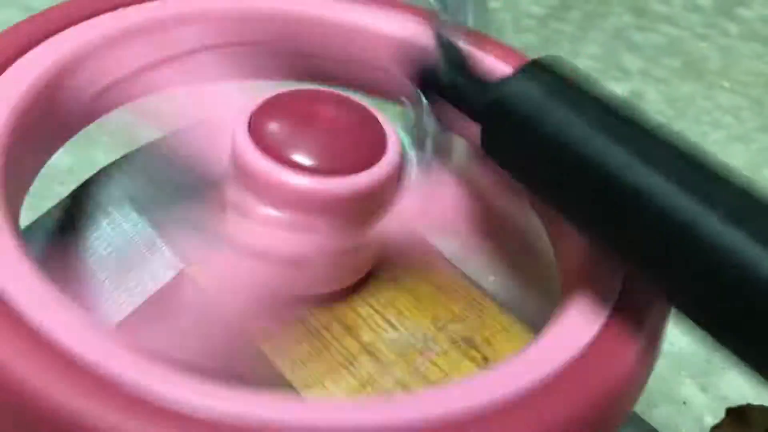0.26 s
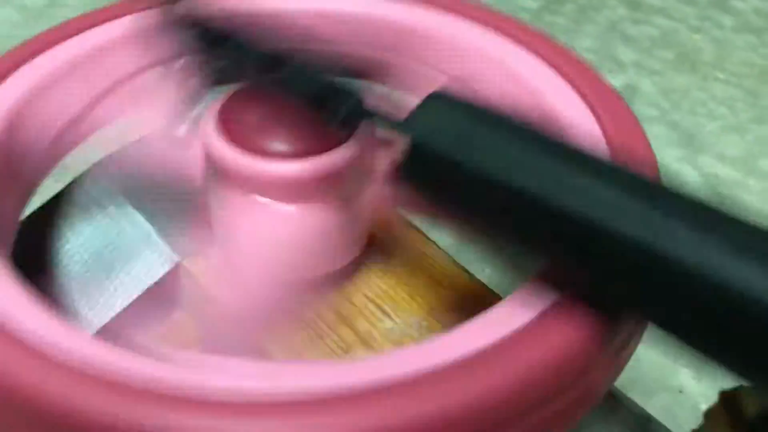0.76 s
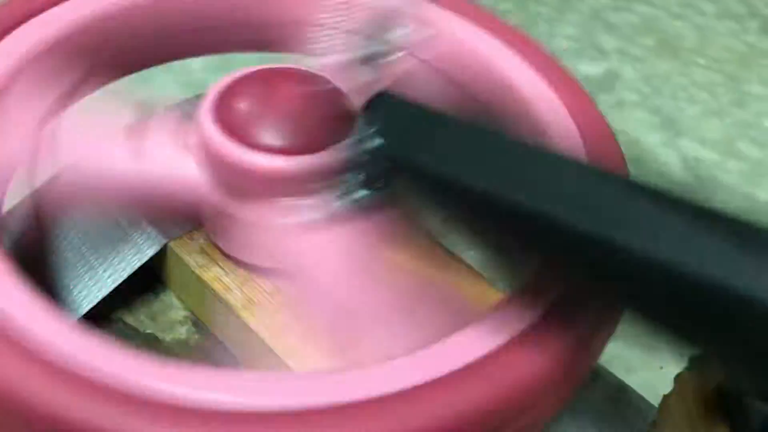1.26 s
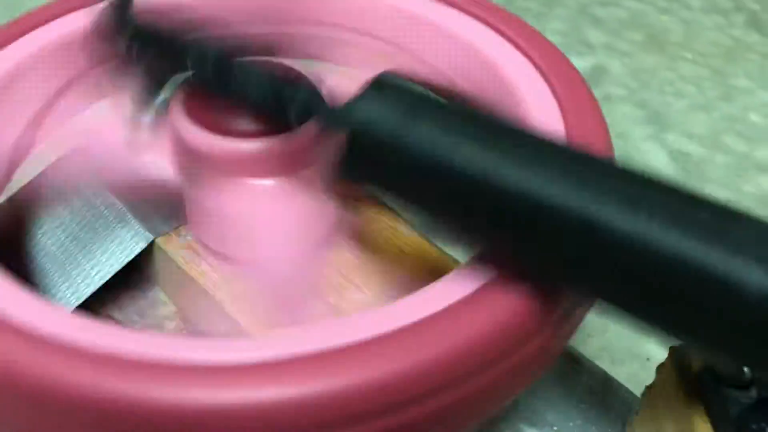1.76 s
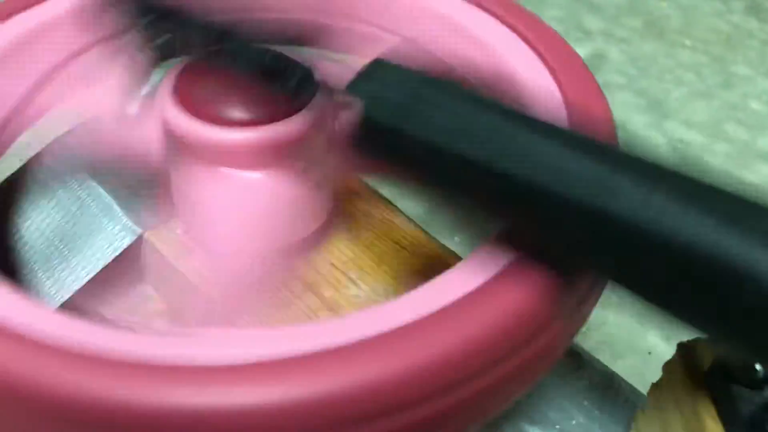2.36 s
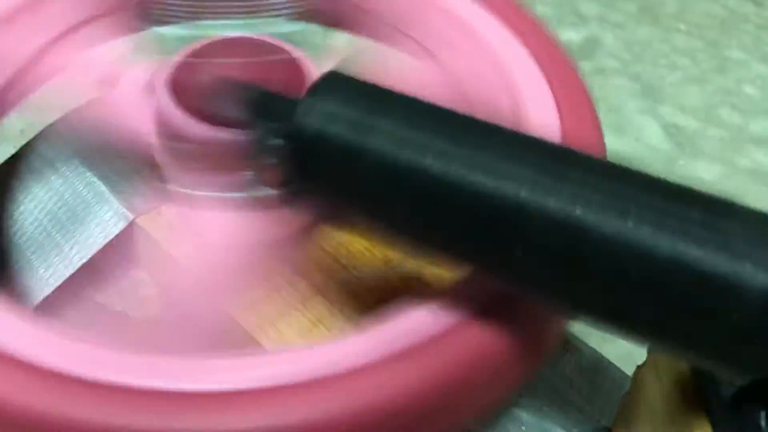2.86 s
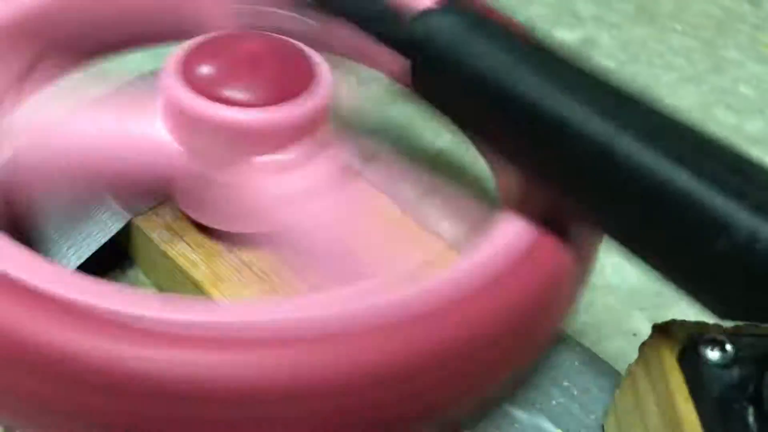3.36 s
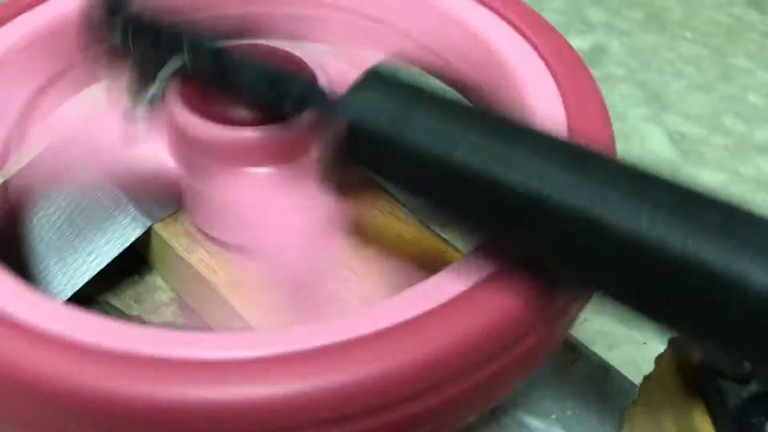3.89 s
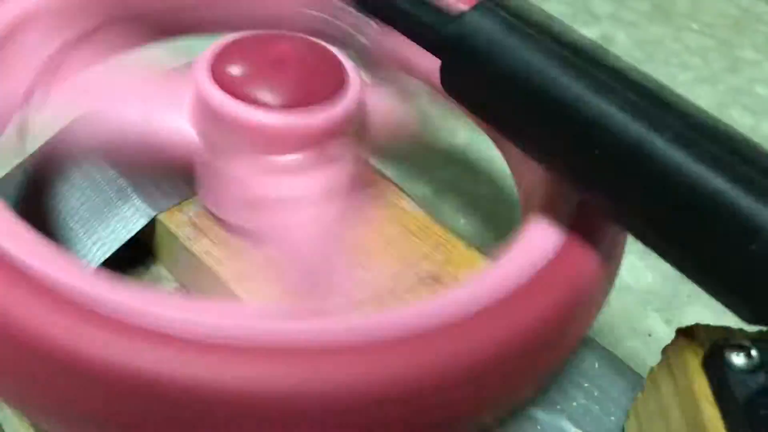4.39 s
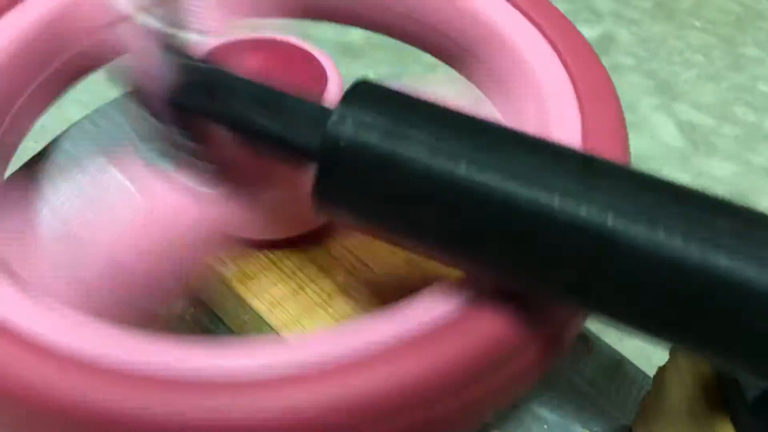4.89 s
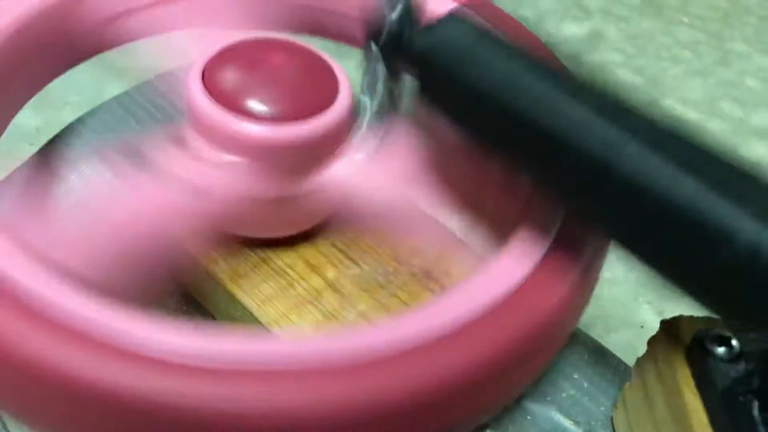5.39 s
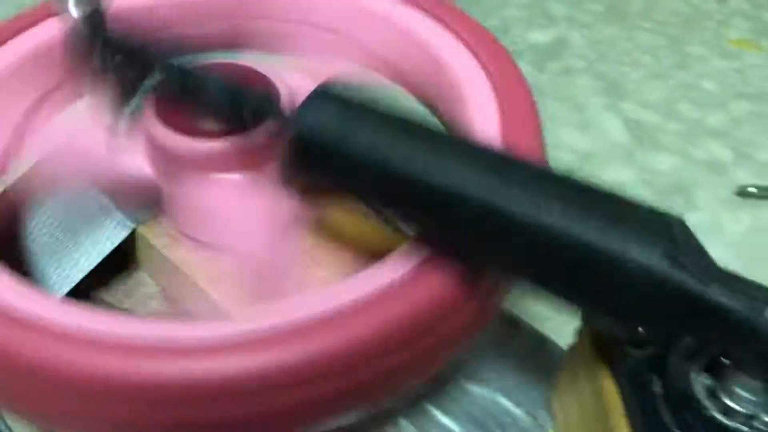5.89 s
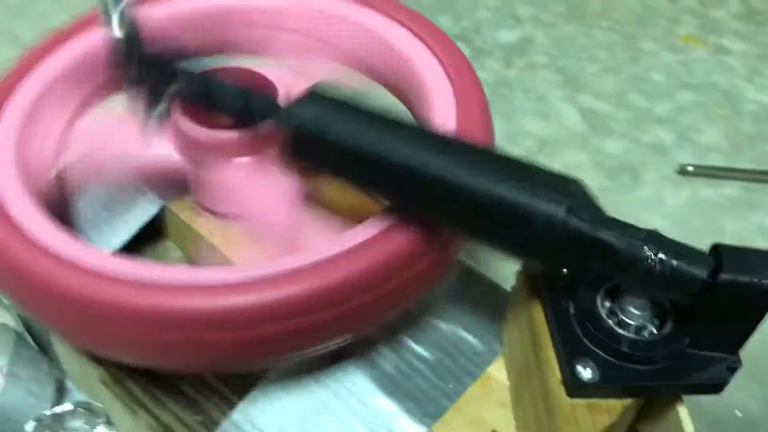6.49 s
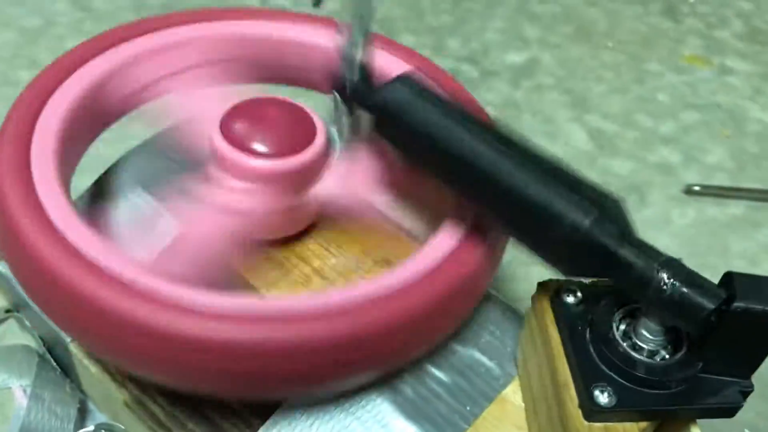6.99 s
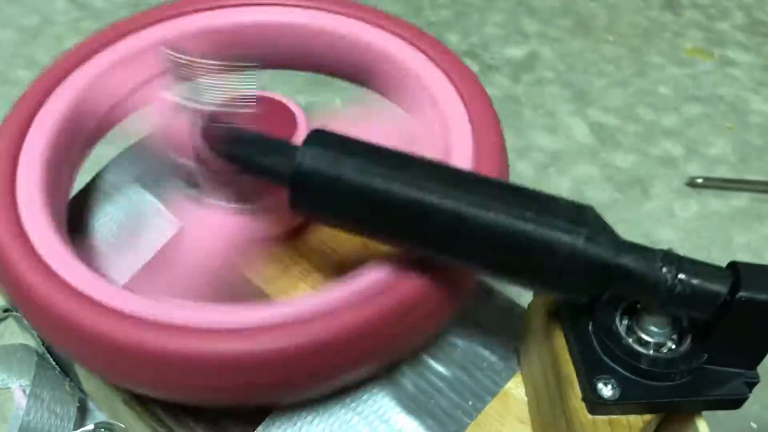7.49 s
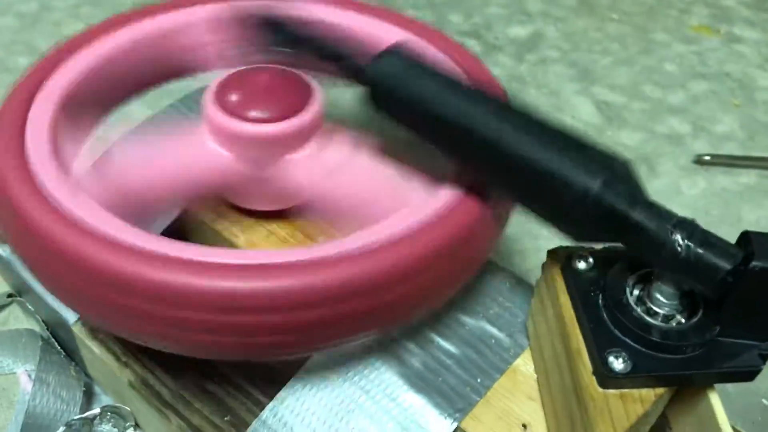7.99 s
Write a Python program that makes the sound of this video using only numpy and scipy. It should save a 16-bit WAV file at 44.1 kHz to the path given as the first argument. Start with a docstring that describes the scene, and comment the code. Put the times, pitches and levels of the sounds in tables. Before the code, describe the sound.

A small compressed-air engine runs steadily beside a close hand-held microphone. Bright air hiss never stops, swelling into about five puffs a second. Each turn brings a hollow puff, a hard little knock with a squirt of air, then a lower hollow note sliding down and a soft thud. Faint motor hum and low rumble lie beneath, and the hiss changes colour slightly as the microphone drifts.

```python
"""A small compressed-air engine turns a plastic wheel five times a second, close to one hand-held microphone.
From the start to the end air hisses from the valve, as jet noise swelling with the crank angle. Each turn, air puffs
ring a short tube before the reversal; there the rod knocks modes and trapped air squirts; then a long tube, blown
by air, drops in pitch as the piston draws out, and the stand thuds. A motor hums in the room over a low rumble.
The colour of the hiss shifts near 1 s and twice around 6 s as the microphone drifts, and the rumble falls a little."""
import sys
import numpy as np
from scipy import signal
from scipy.io import wavfile
from scipy.ndimage import uniform_filter1d

SR = 44100
rng = np.random.default_rng(int(sys.argv[2]) if len(sys.argv) > 2 else 0)


def master_out(mix):
    """Clip the mix to full scale and print it as 16-bit PCM to the path in sys.argv[1]."""
    frames = np.transpose(np.atleast_2d(mix))
    ceiling = np.clip(frames, -1, 1)
    pcm = np.round(ceiling * 32767).astype(np.int16)
    wavfile.write(sys.argv[1], SR, pcm)


N = 363825

# Turns of the crank. Each row: piston reversal in seconds, short-tube puff in dB, long-tube puff in dB,
# rod knock in dB and stand thud in dB, the last two being peaks before a fixed trim.
TURNS = [(0.033, -25, -29.5, -26, -39), (0.215, -24.5, -36, -21, -34), (0.402, -26.5, -34, -6.5, -32),
         (0.592, -26, -26.5, -10, -35), (0.783, -25.5, -26.5, -8.5, -28), (0.977, -26, -27, -8, -31),
         (1.169, -24, -26.5, -13, -26), (1.361, -22, -31, -13, -28), (1.557, -22.5, -27, -13, -26),
         (1.757, -24, -29, -14, -29), (1.953, -23.5, -28.5, -10, -42), (2.153, -23.5, -29.5, -13, -25),
         (2.353, -21, -27, -23, -25), (2.551, -23, -27.5, -11, -23), (2.751, -22.5, -26, -11, -35),
         (2.947, -22.5, -28, -6.5, -41), (3.144, -25.5, -25.5, -9, -30), (3.339, -21.5, -28, -14, -33),
         (3.535, -24, -29, -7, -37), (3.731, -25, -26, -11, -24), (3.926, -24, -27, -14, -32),
         (4.127, -23, -31, -16, -32), (4.324, -20, -29, -12, -24), (4.521, -23.5, -29, -11, -25),
         (4.724, -25, -30.5, -10.5, -36), (4.925, -21, -29, -7.5, -33), (5.125, -23.5, -27, -9, -25),
         (5.328, -22.5, -27.5, -9, -29), (5.528, -23, -28.5, -10, -32), (5.729, -23, -30, -6, -32),
         (5.925, -24, -27.5, -10.5, -26), (6.123, -24, -29.5, -12, -40), (6.327, -24.5, -29, -12, -25),
         (6.529, -25.5, -28, -12, -37), (6.734, -28, -31.5, -8, -41), (6.932, -28.5, -30.5, -11, -44),
         (7.132, -31, -28, -9.5, -29), (7.335, -28, -29.5, -10, -41), (7.538, -27.5, -30, -17, -34),
         (7.737, -31, -30.5, -8.5, -31), (7.945, -28, -32, -10, -28), (8.151, -29, -29, -7.5, -39)]
# Valve stages: exhaust port open, flow cut off before the reversal, surge as the port narrows, surge half a turn
# away, last rush at the reversal, pressure on the seal, flow cut off again. Each row: centre, rise and fall in
# shares of a turn, then what it adds to exhaust rush, steady flow and seal leak as factors.
VALVE_STAGES = [(0.68, 0.13, 0.099, 0.87, 0.016, 0.2), (0.96, 0.035, 0.037, -0.027, -0.67, 0.083),
                (.86, .05, .05, 0.13, 0.37, 0.033), (0.466, 0.053, .06, -0.043, 0.11, 0),
                (.005, 0.026, .05, 0.058, 0.062, 0.11), (0.067, 0.086, 0.21, -0.017, -0.39, 0.83),
                (.26, 0.063, 0.09, -0.044, -0.76, 0.14)]
# Lift of the hiss by one unit of each part. Each row: frequency in Hz, rush in dB, flow in dB, leak in dB.
HISS_LIFT = [(900, -4, -3, 7.5), (1410, 7, -1, 6), (1960, 3, 5.5, 4.5), (2650, 4.5, 2, 1),
             (3020, 7.5, 1, -2), (3420, 2, 1.5, -1), (4170, 0.5, 3.5, -0.5), (5060, 0.5, 3.5, 1),
             (5500, -1, 5, 0), (5700, 1, 4.5, 0.5), (6600, 1.5, 2.5, 3), (8460, 5.5, 1, -4),
             (10200, -0.5, 1, 5), (13000, 1, 0.5, 4.5), (15500, 0, 0, 3.5)]
# Air supply. Each row: time in seconds, hiss level in dB, force of the exhaust rush as a factor.
AIR_SUPPLY = [(0, -16.5, 0.57), (.2, -18, 0.61), (.55, -17, 1.6), (1, -17, 1.5), (1.6, -16.5, 0.94),
              (2.3, -17, 1.07), (3, -17.5, 0.95), (3.8, -17.5, 1.1), (4.6, -17, 0.9), (5.4, -18, 0.88),
              (5.9, -16.5, 1.26), (6.6, -17, 0.94), (7.4, -17.5, 0.9), (8.25, -18.5, 0.5)]
# Microphone drift past nearby surfaces. Each row: time in seconds, number of the standpoint.
MIC_DRIFT = [(0, 0), (.9, 0), (1.3, 1), (5.5, 1), (6, 2), (6.4, 2), (6.75, 3), (8.25, 3)]
# Broad hiss colour, one table a standpoint. Each row: frequency in Hz, relative density in dB per Hz.
STANDPOINT_SLOPES = [
    [(240, -41), (400, -8), (839, -6.5), (1070, -5.5), (1380, -6.5), (2090, -4), (2400, -2.5), (3160, 0),
     (5030, -7.5), (5690, -0.5), (10400, -8), (12300, -10), (16000, -11)],
    [(240, -45), (400, -8.5), (865, -8), (1010, -7.5), (2120, -3.5), (2880, -3), (3160, 0), (4050, -5.5),
     (5690, -4), (9760, -4.5), (10500, -11.5), (15000, -7.5), (16000, -15)],
    [(240, -45), (400, -10), (893, -10.5), (1930, -7), (2250, -7), (2840, -0.5), (3420, 0.5), (3870, -6),
     (6640, -6.5), (9180, -5.5), (10700, -10), (15000, -8.5), (16000, -4.5)],
    [(240, -46), (400, -12.5), (1130, -8), (1680, -5.5), (1840, -11), (2090, -0.5), (2550, -8), (3260, 1),
     (4800, -4), (6850, -6.5), (10400, -9), (15000, -6.5), (16000, -5.5)],
]
# Hiss resonances, one table a standpoint. Each row: frequency in Hz, width in Hz, mean relative level in dB.
STANDPOINT_RINGS = [
    [(2100, 140, -1.5), (3150, 280, -0.5), (3720, 82, 2), (4300, 57, -6), (4740, 88, -2.5), (5780, 210, -2),
     (7030, 160, 3), (8670, 200, -3), (9100, 150, -3), (10000, 71, -7), (10800, 230, -19), (12000, 480, -6),
     (12700, 210, -4), (15200, 210, -4)],
    [(2020, 260, -11.5), (3180, 255, 4), (3764, 250, -0.5), (4308, 107, -2), (5497, 140, 0.5),
     (5880, 160, 0.5), (6330, 240, -11.5), (6920, 140, -2.5), (8630, 180, -3), (9950, 84, -4.5),
     (10850, 250, -8), (11400, 140, -8), (11700, 330, -10.5), (14800, 260, -15), (15500, 220, -5)],
    [(1900, 410, -6), (3430, 490, -7.5), (4590, 160, -6.5), (5850, 65, -5), (6540, 88, -1), (6930, 37, 0),
     (8110, 85, -12), (8500, 110, -13), (9000, 200, -3), (10600, 27, -14), (11800, 210, -10),
     (15500, 140, 4)],
    [(1710, 110, -5), (2090, 190, -4.5), (2940, 400, 0.5), (3760, 300, -2.5), (4180, 130, 3.5),
     (5100, 140, -7), (6300, 280, 0.5), (6870, 400, -4), (8200, 340, -4), (8830, 200, -2), (9560, 300, -5),
     (11250, 120, -9), (12800, 200, -5), (14100, 300, -6), (15400, 700, -2.5)],
]
# Narrow dips in the hiss colour. Each row: frequency in Hz, width in Hz, depth in dB.
HISS_DIPS = [(550, 76, -1.5), (1360, 58, -1), (4090, 124, -2.5), (4820, 250, -0.5), (6280, 120, -2),
             (7650, 330, -2), (10500, 350, -2.5)]
# Puffs into each tube. Each row: centre, rise and fall in shares of a turn, level in dB against the turn's puff.
SHORT_TUBE_PUFFS = [(0.855, .07, 0.052, -8), (0.94, 0.047, 0.054, 3), (0.024, .02, 0.12, -2.5)]
LONG_TUBE_PUFFS = [(.98, 0.039, 0.041, -4.5), (0.17, .11, 0.058, -1), (.31, .07, 0.1, -8),
                   (0.96, 0.22, .12, -21)]
# Modes of the rod and of the stand. Each row: frequency in Hz before detuning, relative level in dB, t60 in seconds.
ROD_MODES = [(1028, -7, 0.28), (1450, 0, 0.033), (2090, 5, .04), (3040, 4, 0.027), (4230, -9, .02)]
STAND_MODES = [(275, 5, 0.032), (354, 3.5, 0.037), (530, -14, .04)]
# Room drones. Each row: frequency in Hz, width of the first resonator in Hz, level in dB rms.
ROOM_DRONES = [(64.7, 7.5, -44), (72.3, 7.6, -52), (86, 5.7, -51), (146.8, 12, -49), (156.6, 5.4, -50.5),
               (204, 16, -50), (313.1, 5.7, -51.5)]
# Steady motor tones. Each row: frequency in Hz, level in dB rms.
MOTOR_TONES = [(109.6, -51), (119.9, -41.5), (239.8, -53.5)]
# Low rumble. Each row: frequency in Hz, relative density in dB per Hz.
RUMBLE_SPECTRUM = [(15, -44), (25, -19), (49, -14), (118, 1), (136, -3), (168, -4.5), (233, -3.5),
                   (356, -12.5), (500, -39), (650, -57), (1100, -120)]

FLOW_OPEN = 0.89  # steady flow between stages, a factor
SHORT_HZ, SHORT_WIDTH_HZ = (1075, 1180), (155, 290)  # before and after the reversal
LONG_HZ, LONG_WIDTH_HZ = (749, 387), (200, 240)  # piston in, piston drawn out
# shares of a turn: leaves the first pitch, arrives at the second, starts back, is back
SHORT_CHANGE, LONG_CHANGE = (0, .06, .3, .75), (.17, .3, .55, .82)
SHORT_REST_DB, LONG_REST_DB = -40, -21.5  # against the turn's puff
KNOCK_LAG_S, THUD_LAG_S, THUD_SCATTER_S = -0.001005, .049, 0.00893
RUMBLE_DB = -40
EDGE_HZ = 15760


def hiss(t):
    """Jet noise, swelling with the valve and coloured by where the microphone stands."""
    white = rng.standard_normal(N)
    swelling = shaped(white, size=256, gain=valve_swell)
    jet = shaped(swelling, size=1024, gain=standpoint)
    s, level_db, _ = np.transpose(AIR_SUPPLY)
    return evened(jet) * gain_of(np.interp(t, s, level_db))


def valve_swell(t, hz, patchy_db=1.05, flicker_db=0.45):
    """Valve stages lift parts of the hiss spectrum; eddies add patches and a wide flicker."""
    rush, flow, leak = sum(np.outer(row[3:], stage(t, *row[:3])) for row in VALVE_STAGES)
    s, _, force = np.transpose(AIR_SUPPLY)
    parts = rush * np.interp(t, s, force), FLOW_OPEN + flow, leak
    lift_db = sum(np.outer(db, part) for db, part in zip(read(HISS_LIFT, hz), parts))
    patches_db = patchy_db * lumps(lift_db.shape, (8, 8))
    wide_db = flicker_db * lumps(len(t), (3,))
    return gain_of(lift_db + patches_db + wide_db)


def standpoint(t, hz, slope_db=-0.5, ripple_db=2.0, swell_db=2.0, wobble=0.005):
    """Slope plus resonances of each standpoint, with fine room ripple, blended as the microphone drifts."""
    place = np.interp(t, *np.transpose(MIC_DRIFT))
    level_db = np.zeros((len(hz), len(t)))
    for k, (slope, rings) in enumerate(zip(STANDPOINT_SLOPES, STANDPOINT_RINGS)):
        weight = np.clip(1 - abs(place - k), 0, 1)
        near = weight > 0
        slope_power = gain_of(2 * (read(slope, hz)[0] + slope_db))
        power = slope_power[:, None] * np.ones(near.sum())
        for ring_hz, width_hz, db in rings:  # each resonance swells and wavers at random
            swell, waver = lumps((2, len(t)), (1, 9))[:, near]
            off = 2 * (hz[:, None] - ring_hz * (1 + wobble * waver)) / width_hz
            power = power + gain_of(2 * (db + swell_db * swell)) / (1 + off ** 2) ** 2
        room_db = ripple_db * lumps(len(hz), (2,))[:, None]
        colour_db = 10 * np.log10(power / power.mean()) + room_db
        level_db[:, near] += weight[near] * colour_db
    dips_db = sum(db * np.exp(-((hz - dip_hz) / width_hz) ** 2) for dip_hz, width_hz, db in HISS_DIPS)
    return gain_of(level_db + dips_db[:, None])


def tube(t, ends_hz, widths_hz, change, puffs, rest_db, column, hold_s, waver, sputter_db=1.5, steadiness=0.2):
    """Sputtering air blows a tube; narrow and wide resonances are mixed to give its changing width."""
    moved = np.interp(crank(t), np.sort(change), (0, 1, 1, 0))
    hz, width_hz = (a + (b - a) * moved for a, b in (ends_hz, widths_hz))
    hz = hz * (1 + waver * lumps(N, (900,)))  # the pitch wavers at random
    air = rng.standard_normal(N) * gain_of(sputter_db * lumps(N, (150,)))
    narrow, wide = (evened(resonate(resonate(air, hz, w), hz, 2 * w)) for w in (110, 320))
    share = np.clip((width_hz - 110) / 210, 0, 1)
    tone = evened((1 - share) * narrow + share * wide)
    # a blown tube holds its own strength
    local_power = uniform_filter1d(tone ** 2, size=500)
    tone = tone / (local_power + .05) ** np.clip(steadiness, 0, .5)
    swell = gain_of(rest_db) + sum(gain_of(db) * stage(t, *when) for *when, db in puffs)
    # each turn's level holds until hold_s after its reversal
    rows = np.transpose(TURNS)
    turn = np.clip(np.searchsorted(rows[0], t - hold_s), 0, len(TURNS) - 1)
    puff_db = uniform_filter1d(rows[column][turn], size=400)
    return evened(tone) * swell * gain_of(puff_db)


def blows(events, modes, contact_s, trim_db, low_hz):
    """Each blow is a short scrape that rings modes detuned every time; a high-pass keeps out bass below low_hz."""
    out, t = np.zeros(N + SR), np.arange(3000) / SR
    high_pass = signal.butter(3, low_hz, "high", fs=SR)
    for s, peak_db in events:
        detune = rng.uniform(0.92, 1.05, len(modes))
        ring = sum(gain_of(db - 60 * t / t60_s) * np.sin(2 * np.pi * hz * k * t)
                   for (hz, db, t60_s), k in zip(modes, detune))
        scrape = (1 + 0.31 * rng.standard_normal(len(t))) * np.exp(-t / contact_s)
        struck = signal.oaconvolve(ring, scrape)[:len(t)]
        sound = signal.lfilter(*high_pass, struck)
        out[round(s * SR):][:len(t)] += gain_of(peak_db + trim_db) * sound / abs(sound).max()
    return out[:N]


def chuffs(events, rise_s=0.0043, fall_s=0.0059, from_hz=1200, to_hz=2700, width_hz=700, trim_db=-3.5):
    """Trapped air squirts out at each reversal, its pitch shooting up as the gap shuts."""
    out, t = np.zeros(N + SR), np.arange(1500) / SR
    swell = (1 - np.exp(-t / rise_s)) * np.exp(-t / fall_s)
    hz = to_hz + (from_hz - to_hz) * np.exp(-(t / .007) ** 2)
    for s, peak_db in events:
        white = rng.standard_normal(len(t))
        air = resonate(resonate(white, hz, width_hz), hz, 2 * width_hz) * swell
        out[round((s - .002) * SR):][:len(t)] += gain_of(peak_db + trim_db) * air / abs(air).max()
    return out[:N]


def room_tone(t):
    """Low rumble and drones from filtered noise, motor tones from steady sines."""
    motor = sum(gain_of(db) * np.sqrt(2) * np.sin(2 * np.pi * hz * t) for hz, db in MOTOR_TONES)
    drones = 0
    for hz, width_hz, db in ROOM_DRONES:
        drone = resonate(resonate(rng.standard_normal(N), hz, width_hz), hz, 48)
        drones = drones + gain_of(db) * evened(drone)
    rumble = shaped(rng.standard_normal(N), size=4096,
                    gain=lambda t, hz: gain_of(read(RUMBLE_SPECTRUM, hz)[0])[:, None])
    # the microphone backs away from the stand
    rumble = rumble * gain_of(np.interp(t, (5.7, 6.8), (0, -2.5)))
    return gain_of(RUMBLE_DB) * evened(rumble) + drones + motor


def crank(t):
    """Share of the turn at times t, 0 at the timed reversal."""
    s = np.transpose(TURNS)[0]
    s = np.r_[2 * s[0] - s[1], s, 2 * s[-1] - s[-2]]
    return np.interp(t, s, np.arange(len(s))) % 1


def stage(t, centre, rise, fall):
    """A swell of height 1 once a turn, peaking at the crank angle centre."""
    late = (crank(t) - centre + .5) % 1 - .5
    return np.exp(-(late / np.where(late < 0, rise, fall)) ** 2)


def resonate(x, hz, width_hz):
    """One-pole resonance: shifts the curve hz to zero, smooths, shifts back."""
    turn = np.exp(2j * np.pi * np.cumsum(hz * np.ones(len(x))) / SR)
    r = np.exp(-np.pi * width_hz / SR)
    return 2 * (turn * signal.lfilter([1 - r], [1, -r], x / turn)).real


def shaped(x, size, gain):
    """Multiplies the short-time spectrum of x by gain(t, hz)."""
    overlap = size - size // 4
    hz, t, z = signal.stft(x, SR, nperseg=size, noverlap=overlap)
    return signal.istft(z * gain(t, hz), SR, nperseg=size, noverlap=overlap)[1][:N]


def lumps(shape, sizes):
    """Smooth chance of rms 1: noise averaged over sizes, one size an axis."""
    x = rng.standard_normal(shape)
    for axis, size in enumerate(sizes):
        x = uniform_filter1d(x, size=size, axis=axis)
    return evened(x)


def read(points, hz):
    """Each column of a spectrum table, joined on a log-frequency axis."""
    f, *columns = np.transpose(points)
    return [np.interp(np.log(hz + 1), np.log(f + 1), c) for c in columns]


def gain_of(db):
    """Amplitude factor of a level in dB."""
    return 10 ** (np.asarray(db) / 20)


def evened(x):
    """Scales x to rms 1."""
    return x / np.sqrt(np.mean(x ** 2) + 1e-20)


def scene():
    """All sources at one microphone, the same in both channels."""
    t = np.arange(N) / SR
    short_tube = tube(t, SHORT_HZ, SHORT_WIDTH_HZ, SHORT_CHANGE, SHORT_TUBE_PUFFS, SHORT_REST_DB,
                      column=1, hold_s=.09, waver=0.032)
    long_tube = tube(t, LONG_HZ, LONG_WIDTH_HZ, LONG_CHANGE, LONG_TUBE_PUFFS, LONG_REST_DB,
                     column=2, hold_s=0.124, waver=0.04)
    s, _, _, knock_db, thud_db = np.transpose(TURNS)
    rod = np.c_[s + KNOCK_LAG_S, knock_db]
    stand = np.c_[s + THUD_LAG_S + THUD_SCATTER_S * rng.standard_normal(len(s)), thud_db]
    knocks = blows(rod, ROD_MODES, contact_s=0.0001, trim_db=-7, low_hz=910)
    thuds = blows(stand, STAND_MODES, contact_s=0.00066, trim_db=1.0, low_hz=199)
    mono = hiss(t) + short_tube + long_tube + knocks + chuffs(rod) + thuds + room_tone(t)
    return np.tile(mono, (2, 1))


def record(dry):
    """Band limit: a linear-phase low-pass at EDGE_HZ."""
    low_pass = signal.firwin(1023, EDGE_HZ, window=("kaiser", 9), fs=SR)
    return signal.oaconvolve(dry, low_pass[None], "same")


dry = scene()
out = record(dry)
master_out(out)
```